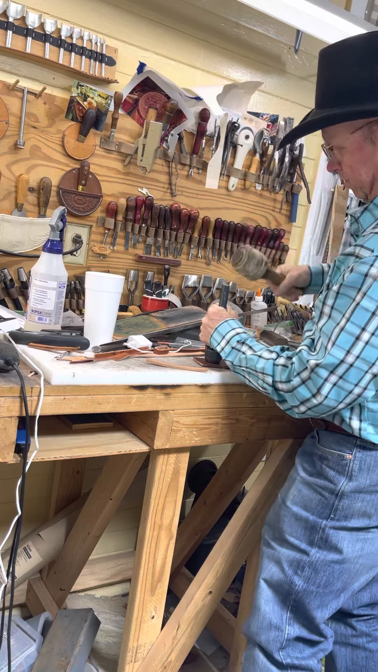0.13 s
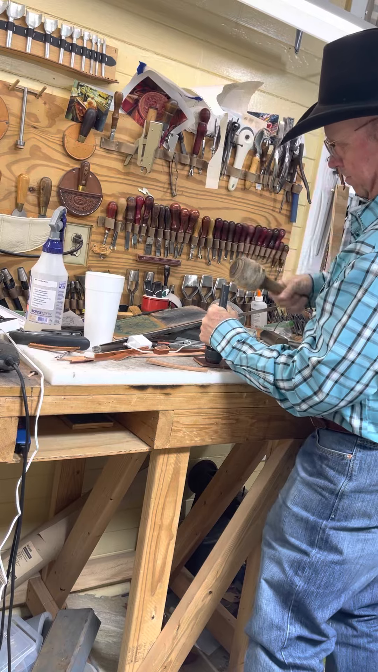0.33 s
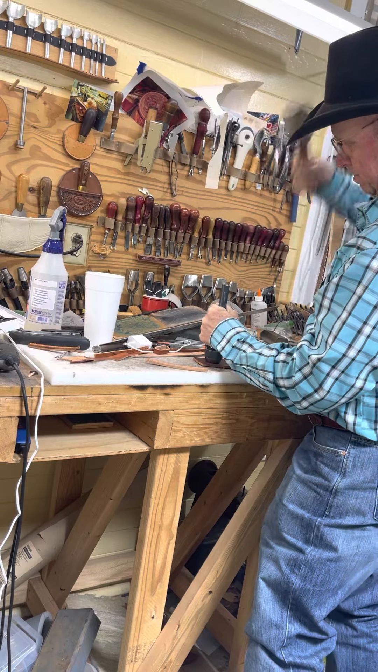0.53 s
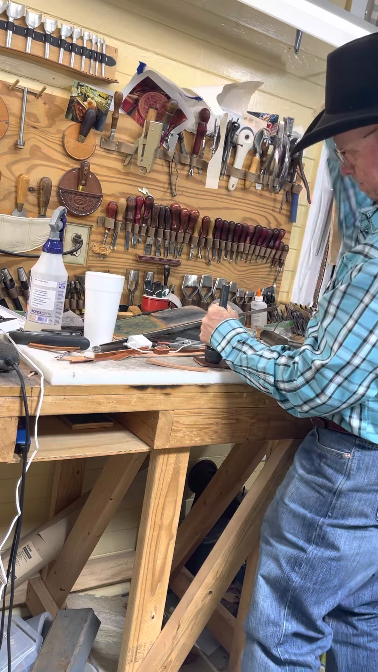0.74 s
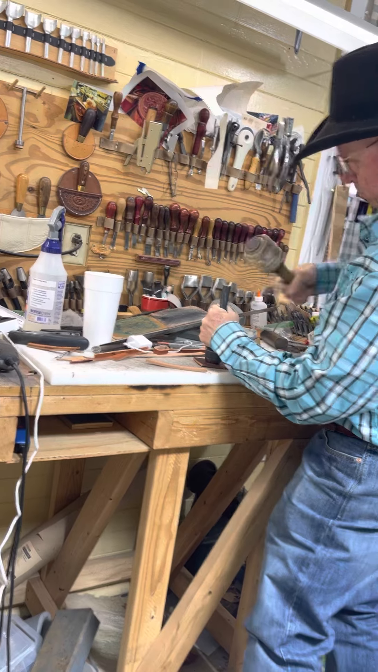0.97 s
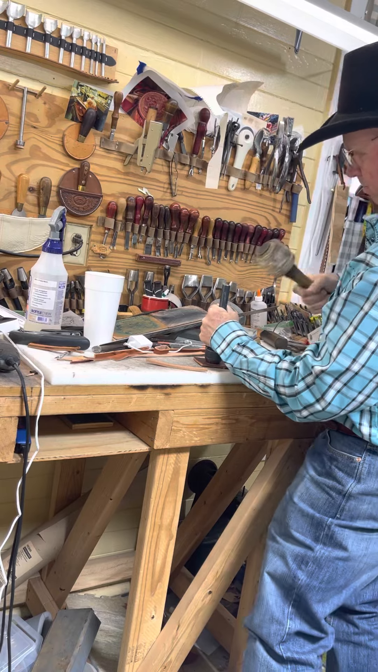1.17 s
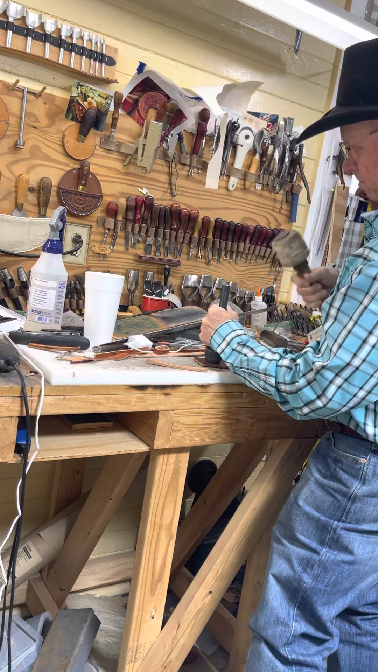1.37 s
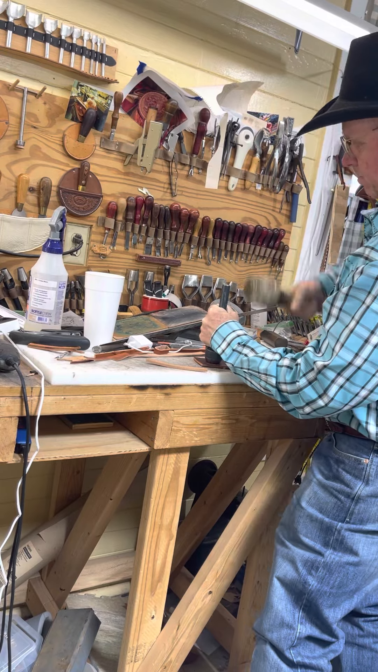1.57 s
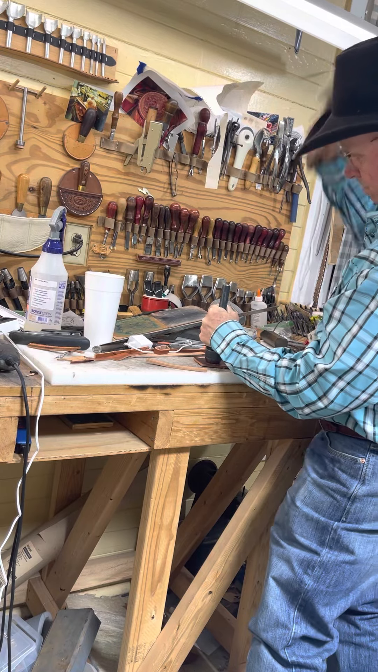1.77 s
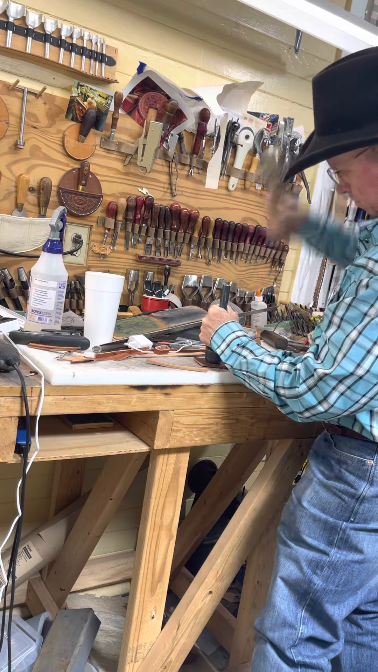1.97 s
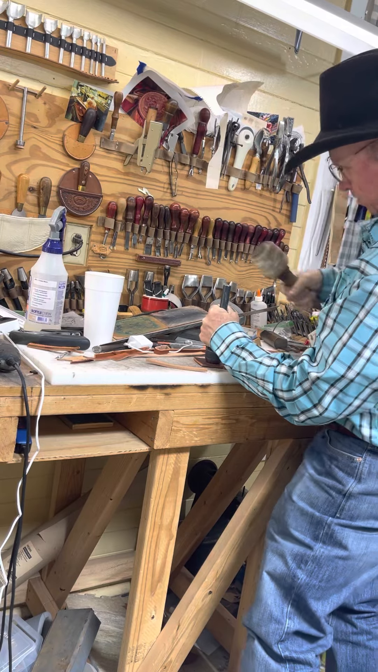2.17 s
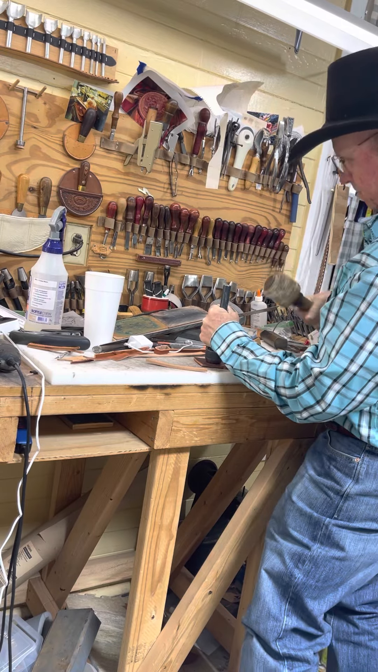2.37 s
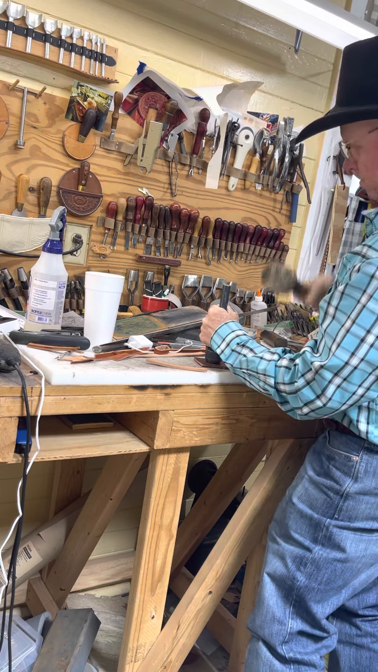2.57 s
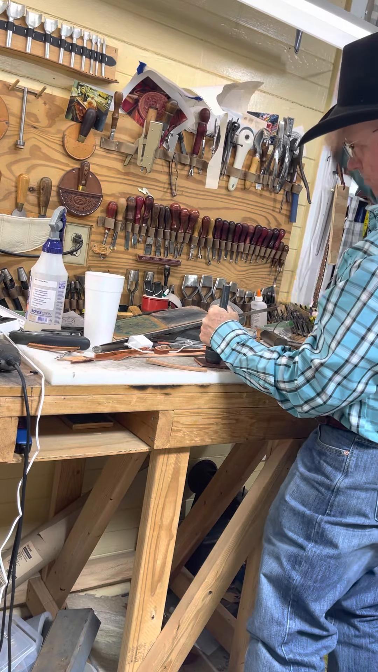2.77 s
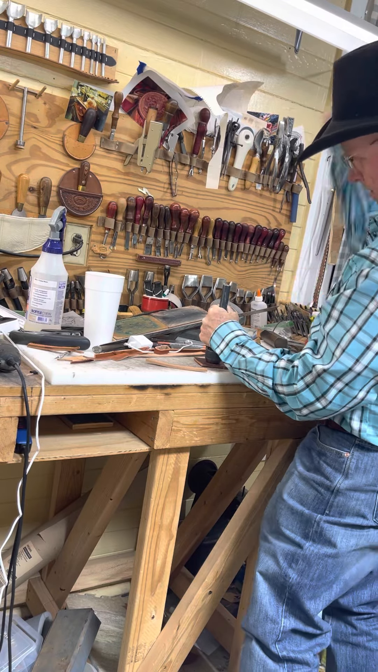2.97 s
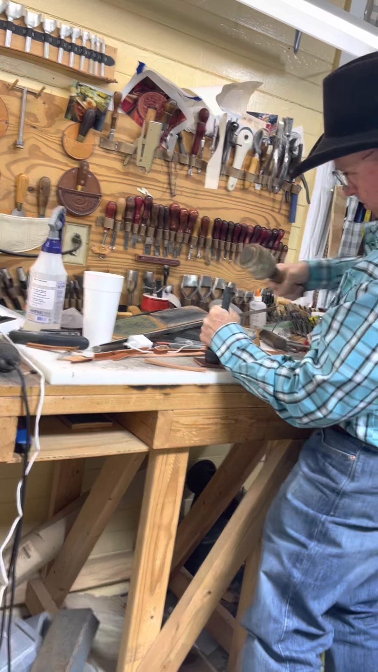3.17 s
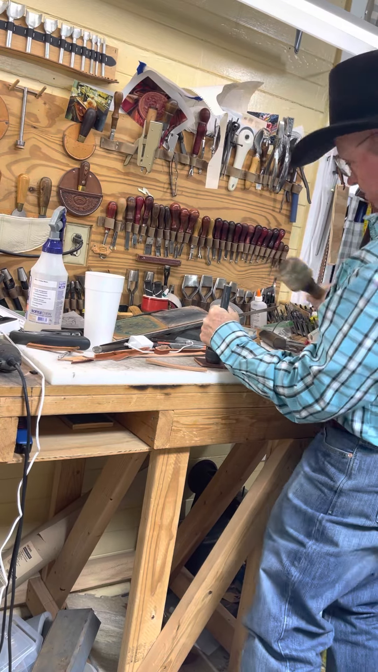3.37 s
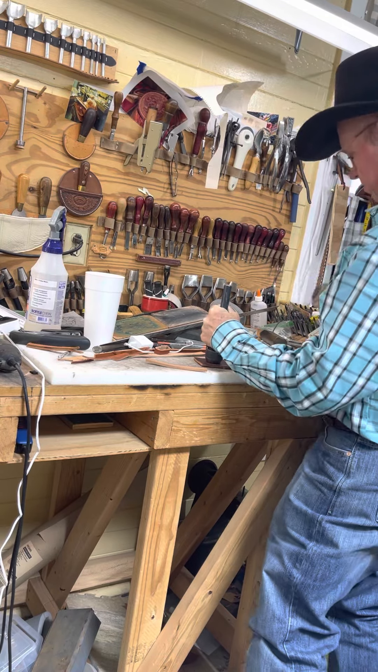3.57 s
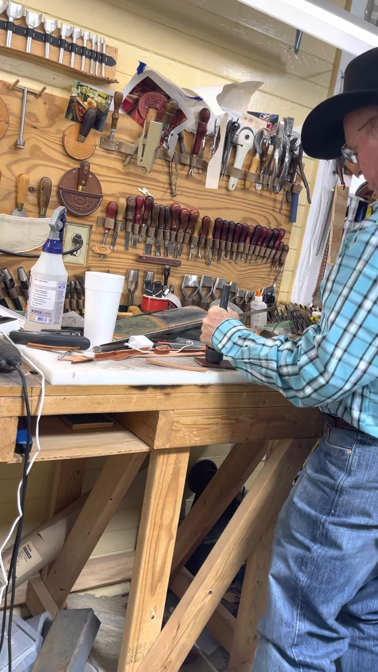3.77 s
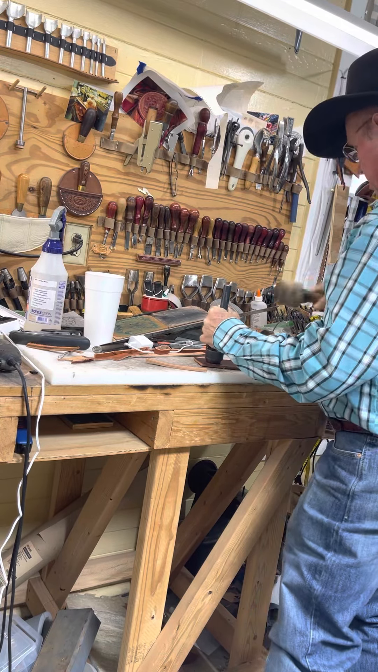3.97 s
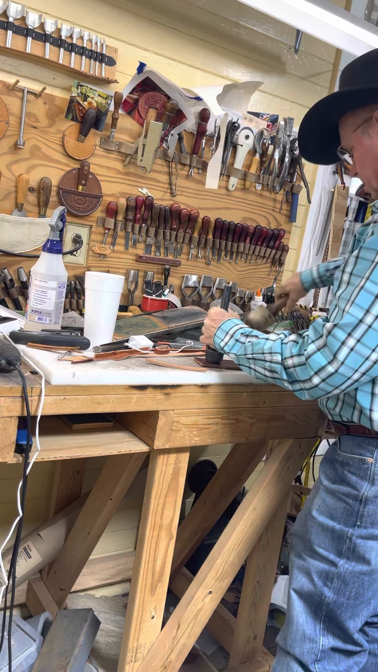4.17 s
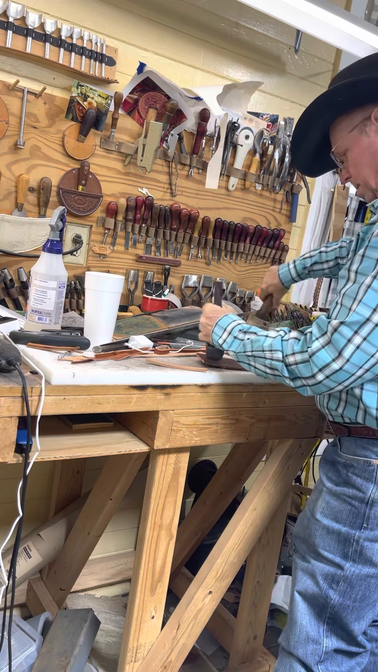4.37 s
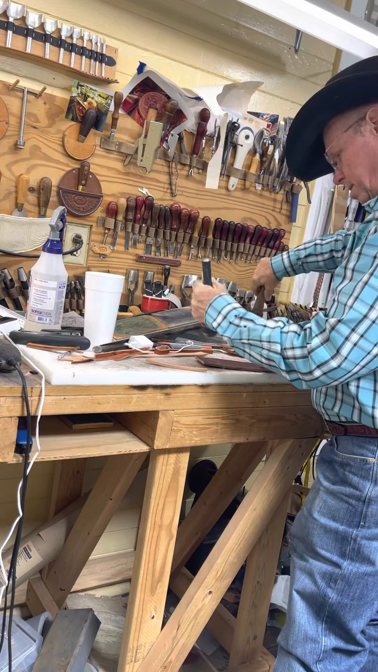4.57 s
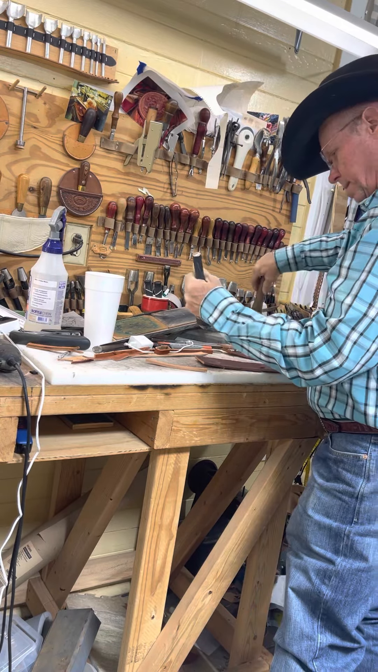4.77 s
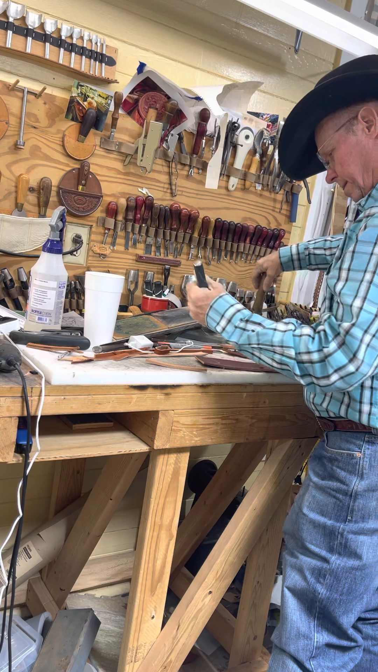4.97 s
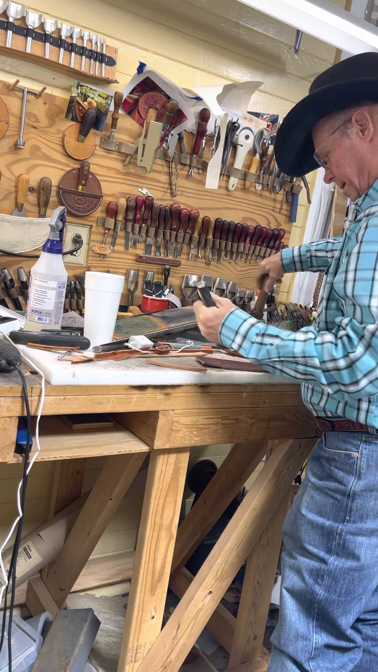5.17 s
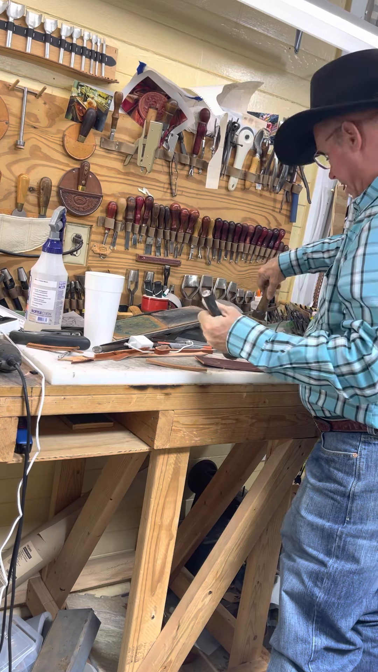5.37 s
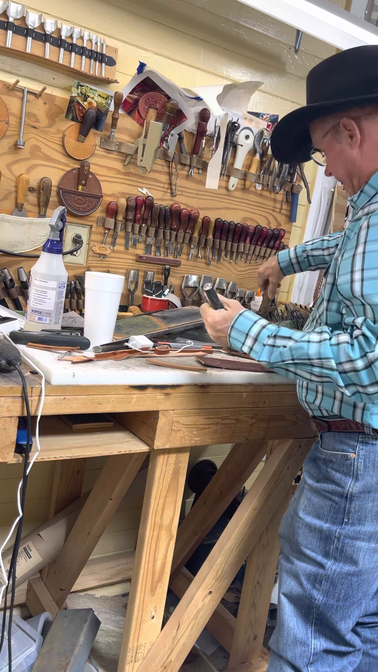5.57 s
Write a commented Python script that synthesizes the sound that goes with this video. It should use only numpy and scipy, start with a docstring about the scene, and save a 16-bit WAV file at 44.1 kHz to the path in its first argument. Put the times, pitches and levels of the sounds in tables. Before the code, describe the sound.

The dying end of a blow, then three sharp, woody, booming mallet strikes about one second apart, close to a stereo recorder that squashes their peaks. Loose tools shake, thin steel rings faintly and the room answers for about half a second. Then the maul is put down with a softer knock, tools tick, scrape and clink, and a last tiny metallic click comes over faint rumble and hiss.

```python
"""At a heavy workbench a wooden maul drives a hand-held steel cutter through leather, about one blow a second.
Noise bursts make each crack, damped modes the booming bench and faint steel ring, decaying noise the room.
A lighter knock follows as the maul comes to rest; then tools clatter, scrape and clink over rumble and hiss.
The recorder's limiter ducks each blow."""
import sys
import numpy as np
from scipy import signal
from scipy.fft import rfft, irfft, next_fast_len
from scipy.io import wavfile
from scipy.ndimage import uniform_filter1d, minimum_filter1d, map_coordinates

SR = 44100
rng = np.random.default_rng(int(sys.argv[2]) if len(sys.argv) > 2 else 0)


def inscribe(sig):
    """Save sig as 16-bit PCM at rate SR to the path in sys.argv[1].

    A 1-D sig is mono; a 2-D sig holds one channel per row.
    Samples are clipped to [-1, 1] before scaling.
    """
    pcm = np.round(np.clip(np.atleast_2d(sig).T, -1, 1) * 32767)
    wavfile.write(sys.argv[1], SR, pcm.astype(np.int16))


N = 247401
T = np.arange(SR) / SR  # one second, the length of every short sound

# spectrum of hard contacts and gritty slides: hz, relative_db_per_hz
TICK = [(500, -4), (2500, -7.5), (4500, -12), (6200, -14), (8500, -13), (11000, -11), (13000, -35),
        (15000, -54.5)]
# hardwood handle: hz, level_db, t60_s
HANDLE_MODES = [(1052, -0.5, 0.012), (1497, -3.5, 0.0078), (2700, -14, .012)]
# racked steel tool: hz, level_db, t60_s
RACK_MODES = [(6140, 0.5, 0.056), (6450, -6.5, 0.081), (11000, -19, 0.073)]
# hand-held cutter when touched: hz, level_db, t60_s
CUTTER_MODES = [(1530, -4, .018), (2710, -6, .016), (3250, -10, .016), (5350, -0.5, 0.16), (5530, -1, 0.13)]


def amp(db):
    """Decibels to gain."""
    return 10 ** (np.asarray(db) / 20)


def unit(x):
    """Scale to rms 1."""
    return x / np.sqrt(np.mean(x ** 2) + 1e-20)


def along(points, hz):
    """Interpolate (hz, value) points on a log frequency axis."""
    f, v = np.transpose(points)
    return np.interp(np.log(hz + 1), np.log(f + 1), v)


def filtered(x, response):
    """Multiply the spectrum of x by a response of frequency."""
    n = x.shape[-1]
    m = next_fast_len(n + SR // 10)
    hz = np.fft.rfftfreq(m, 1 / SR)
    return irfft(rfft(x, m) * response(hz), m)[..., :n]


def add(track, start_s, sound):
    """Mix a sound in, trimmed to the track."""
    start = round(start_s * SR)
    part = sound[..., max(-start, 0):track.shape[-1] - start]
    first = max(start, 0)
    track[..., first:first + part.shape[-1]] += part


def noise(spectrum):
    """One second of coloured noise, the same in both channels."""
    return unit(filtered(rng.standard_normal(SR), lambda hz: amp(along(spectrum, hz))))


def diffuse(spectrum, size=SR):
    """Coloured noise arriving from all sides: mid and side shares set the channel likeness."""
    # left-right likeness of diffuse sound: hz, correlation
    alike = [(150, 0.99), (350, .93), (800, 0.39), (1300, .55), (2000, 0.78), (2700, 0.72), (4400, .5),
             (5900, 0.86), (7500, 1), (11000, 1)]

    def mid_side_gain(hz):
        angle_rad = np.arccos(np.clip(along(alike, hz), -1, 1)) / 2
        return amp(along(spectrum, hz)) * [np.cos(angle_rad), np.sin(angle_rad)]

    mid, side = filtered(rng.standard_normal((2, size)), mid_side_gain)
    return unit(np.array([mid + side, mid - side]))


def strike(t60_s, rise_s, delay_s=0):
    """An envelope that waits, rises and dies away exponentially."""
    age_s = np.maximum(T - delay_s, 0)
    return (1 - np.exp(-age_s / rise_s)) * amp(-60 * age_s / t60_s)


def mode(hz, level_db, t60_s, rise_s, delay_s=0):
    """One damped vibration: a sine under a strike envelope."""
    tone = np.sin(2 * np.pi * hz * (T - delay_s))
    return amp(level_db) * tone * strike(t60_s, rise_s, delay_s)


def wobble(knots_per_s):
    """One second of a smooth random curve."""
    return map_coordinates(rng.standard_normal(int(knots_per_s) + 4), [T * knots_per_s])


def room(spectrum, build_s):
    """The workshop's answer to a short sound: noise whose frequencies each die at their own speed."""
    # reverberation time: hz, t60_s
    room_t60 = [(60, .6), (250, .45), (700, 0.45), (2000, 0.51), (5000, 0.45), (11000, 0.43)]
    hz, t_s, z = signal.stft(diffuse(spectrum), SR, nperseg=256)
    decay = amp(-60 * t_s / along(room_t60, hz)[:, None])
    tail = signal.istft(z * decay, SR, nperseg=256)[1][:, :SR]
    return tail * (1 - np.exp(-T / build_s))


def chatter():
    """The maul makes three contacts, each weaker, plus a strong one as the blade reaches the board."""
    gap_s, loss_db = 0.0038, 5.5
    through_s, through_db = 0.0072, 0
    return [(k * gap_s, -k * loss_db) for k in range(3)] + [(through_s, through_db)]


def crack():
    """Broadband noise, one burst per contact of the chatter."""
    # contact noise: hz, relative_db_per_hz
    crack_spectrum = [(100, -15.5), (600, -2.5), (2000, 1.5), (3500, -0.5), (4200, -3), (5000, -0.5),
                      (6000, -10.5), (7400, -14.5), (8200, -8), (11000, -17), (13000, -31), (16000, -50)]
    bursts = sum(amp(level_db) * strike(0.021, 0.0014, delay_s) for delay_s, level_db in chatter())
    return amp(-8) * noise(crack_spectrum) * bursts


def bench_top():
    """Maul, cutter and bench top ring together; slower low-pitched bending waves arrive last."""
    # joint modes: hz, level_db, t60_s
    top_modes = [(243, 1, .13), (285, -4, .05), (433, 3, .08), (570, -10, .1), (723, -1, .08),
                 (803, -10, .08), (898, -3, .07), (958, -1, .05), (1135, -3, .07), (1243, -3, .07),
                 (1410, -3, .05), (1646, -2, .06), (1792, -7, .05), (1992, -5, .06), (2238, 0, .045),
                 (2565, -8, .04), (3040, -12, .035), (3330, -13, .035), (3470, -10, .035)]
    return amp(-8.5) * sum(mode(hz, level_db + rng.normal(0, 1), t60_s, 0.0015, .09 / np.sqrt(hz))
                           for hz, level_db, t60_s in top_modes)


def bench_frame():
    """The frame and floor boom as damped modes, some set going only by the rebound."""
    # frame and floor modes: hz, level_db, t60_s, delay_s
    frame_modes = [(43, -20.5, .45, .006), (56.9, -20.5, 0.55, 0.0033), (68.6, -20.5, 0.69, 0.0077),
                   (118, -7, 0.033, 0.002), (117.5, 1, .17, 0.038), (159, -15, 0.17, 0.036),
                   (210, -12.5, .2, .016), (227.8, -12, 0.26, 0.011), (321.4, -10, 0.26, .012),
                   (425, -12, 0.07, 0.0089), (560, -10.5, 0.33, 0.011)]
    return amp(-7) * sum(mode(hz, level_db, t60_s, .004, delay_s)
                         for hz, level_db, t60_s, delay_s in frame_modes)


def rattle():
    """Loose tools on the bench jump and rattle: a decaying burst of diffuse noise."""
    # tool noise: hz, relative_db_per_hz
    rattle_spectrum = [(30, -14), (150, -9.5), (300, 6.5), (600, -4), (1100, 1), (2000, -7.5),
                       (4000, -17.5), (7000, -24.5), (11000, -25.5), (13500, -46.5), (15000, -91)]
    return amp(-8.5) * diffuse(rattle_spectrum) * strike(0.18, 0.0037)


def steel_ring():
    """The cutter's thin tone builds up slowly, beats and wavers in the room."""
    # steel modes, the lowest two a beating pair: hz, level_db, t60_s
    steel_modes = [(5484, -1, .62), (5487, -6, .62), (10104, -20, .7), (10573, -16, .42)]
    waver = amp(-29.5 + 1.3 * wobble(45))
    return waver * sum(mode(hz, level_db, t60_s, 0.14) for hz, level_db, t60_s in steel_modes)


def hall(top):
    """The room answers the broad crack and keeps the bench top's notes alive."""
    # room response: hz, relative_db_per_hz
    hall_spectrum = [(25, -23.5), (45, -3), (150, -2.5), (400, 0.5), (750, 3), (1200, -1.5), (2000, -4),
                     (3000, -9), (4800, -17), (6500, -18), (9000, -23), (11200, -17), (12700, -41),
                     (15000, -91)]
    answer = amp(-9.5) * room(hall_spectrum, build_s=0.011)
    top_source = top[None] / np.linalg.norm(top)
    notes = signal.fftconvolve(room(hall_spectrum, build_s=0.002), top_source, axes=1)[:, :SR]
    return answer + amp(-29) * notes


def blows():
    """Each blow cracks on the cutter, spreads through the bench and fills the room."""
    # maul blows, the first already dying away: start_s, force_db, boom_db, ring_db, crack_db
    blow_list = [(-.07, 0, -1.5, 0, 0), (0.8795, 3, 1, -5.5, -4), (2.009, -0.5, -1.5, -1.5, 2),
                 (3.097, -0.5, -2.5, 1.5, 2)]
    out = np.zeros((2, N))
    for start_s, force_db, boom_db, ring_db, crack_db in blow_list:
        top = bench_top()
        # driven hard only while the blade bites through the leather
        biting = .5 - .5 * np.tanh((T - .0108) / 0.003)
        driven = top * amp(4.87 * biting)
        direct = amp(crack_db) * crack() + driven + amp(boom_db) * bench_frame()
        sound = direct + rattle() + amp(ring_db) * steel_ring() + hall(top)
        add(out, start_s, amp(force_db) * sound)
    return out


def background():
    """A low room rumble under a thin hiss; both sink quickly at first, then level off."""
    # room rumble: hz, relative_db_per_hz
    rumble_spectrum = [(20, -24.5), (40, -8), (58, 5.5), (85, -9), (120, 4), (160, -6), (250, -4.5),
                       (330, -8.5), (470, -6.5), (700, -16), (1200, -25), (3000, -46.5), (8000, -110)]
    # hiss: hz, relative_db_per_hz
    hiss_spectrum = [(300, -4), (1000, -1), (2000, -4), (4500, -9), (6300, -10), (8500, -16),
                     (11200, -14.5), (12800, -37), (15000, -80)]
    rumble_db, rumble_extra_db = -62, 23.5  # resting level, starting excess
    hiss_db, hiss_extra_db = -79.5, 24
    settle_s = 1.285
    unsettled = np.exp(-np.arange(N) / SR / settle_s)
    rumble = amp(rumble_db + rumble_extra_db * unsettled) * diffuse(rumble_spectrum, size=N)
    hiss = amp(hiss_db + hiss_extra_db * unsettled) * diffuse(hiss_spectrum, size=N)
    return rumble + hiss


def clatter():
    """The maul meets the bench and nudges tools; harder contacts tick more, thud less, sound higher."""
    # lighter knocks and clatter: start_s, level_db, hardness (0-1)
    knocks = [(3.979, -19.5, 0.29), (4.097, -34, .55), (4.157, -35, 0.8), (4.182, -39, .6),
              (4.233, -36, 0.78), (4.285, -33.5, .55), (4.335, -35, 0.6), (4.375, -39, .2),
              (4.586, -52.5, .1), (4.615, -50.5, 0.42), (5.488, -43, 0.96)]
    # thud modes: hz, level_db, t60_s
    knock_modes = [(259.6, -12.5, 0.21), (338.5, -1, 0.091), (397, -6.5, 0.16), (547, -10.5, 0.14)]
    # wooden contact: hz, relative_db_per_hz
    wood_spectrum = [(60, -15), (300, 2.5), (950, -1), (1600, -10), (3000, -21), (5000, -23), (11000, -36),
                     (15000, -100)]
    out = np.zeros((2, N))
    for start_s, level_db, hardness in knocks:
        # values when soft and when hard
        tick_db = np.interp(hardness, [0, 1], [-36.5, -6])
        thud_db = np.interp(hardness, [0, 1], [4, -20])
        note_hz = np.interp(hardness, [0, 1], [407, 1324])
        wood = amp(-2) * noise(wood_spectrum) * strike(0.03, 0.00049)
        wood_room = amp(-14.5) * room(wood_spectrum, build_s=0.0015)
        note = mode(note_hz, -10.5, 0.046, 0.00025)
        tick = noise(TICK) * strike(0.03, 0.00032) + amp(-7) * room(TICK, build_s=0.0036)
        thud = sum(mode(hz, mode_db, t60_s, 0.003) for hz, mode_db, t60_s in knock_modes)
        sound = wood + wood_room + note + amp(tick_db) * tick + amp(thud_db) * thud
        add(out, start_s, amp(level_db) * sound)
    return out


def rocking():
    """The maul's head lands dully and rocks to rest: fading bumps of low damped modes."""
    # landings: start_s, level_db
    landings = [(4.003, -39.5), (4.39, -35.5), (4.59, -50), (5.541, -48)]
    # bump modes: hz, level_db, t60_s
    bump_modes = [(117.3, -6, 0.11), (164.7, -13, 0.26), (203, -8, 0.13)]
    rock_s, rock_loss_db = .024, 3.5  # per rock
    out = np.zeros((2, N))
    for start_s, level_db in landings:
        for k in range(3):
            bump = sum(mode(hz, mode_db + rng.normal(0, 4.5), t60_s, 0.0015)
                       for hz, mode_db, t60_s in bump_modes)
            add(out, start_s + k * rock_s, amp(level_db - k * rock_loss_db) * bump)
    return out


def scuffs():
    """Steel and leather slide on the bench: gritty noise under a bell-shaped stroke."""
    # slides: middle_s, level_db, half_length_s
    slides = [(4.179, -53, .03), (4.313, -53, 0.041), (4.655, -74.5, 0.038)]
    out = np.zeros((2, N))
    for middle_s, level_db, half_s in slides:
        stroke = np.exp(-.5 * ((T - .5) / half_s) ** 2)
        grit = unit(diffuse(TICK) * amp(5.2 * wobble(250)))
        add(out, middle_s - .5, amp(level_db) * stroke * grit)
    return out


def clinks():
    """Touching tools ring briefly and unevenly; the room smears each ring into a band."""
    # contacts: start_s, level_db, modes that ring
    contacts = [(4.233, -24, HANDLE_MODES), (4.244, -45.5, RACK_MODES), (4.282, -52, RACK_MODES),
                (5.489, -47, CUTTER_MODES)]
    out = np.zeros((2, N))
    for start_s, level_db, modes in contacts:
        for hz, mode_db, t60_s in modes:
            spread = 1.15 + .007 / t60_s  # the shorter the ring, the wider its band
            band = [(hz / spread, -50), (hz, 0), (hz * spread, -50)]
            ring = mode(hz, 0, t60_s, 0.00033) * amp(3.5 * wobble(180))
            # a longer ring puts more energy into the room
            smear = amp(-4) * np.sqrt(t60_s) * room(band, build_s=0.0054)
            add(out, start_s, amp(level_db + mode_db) * (ring + smear))
    return out


def limiter(x, ceiling_db, hold_s, release_s, start_db, recovery_s):
    """Gain drops at once on a loud sound, holds, climbs back; a set opening gain climbs from start_db to 0 dB."""
    power = np.abs(uniform_filter1d(np.mean(x ** 2, axis=0), size=256))
    needed_db = np.minimum(ceiling_db - 10 * np.log10(power + 1e-12), 0)
    # positive origins make both windows look back in time
    h, r = int(hold_s * SR / 2), int(release_s * SR / 2)
    held_db = minimum_filter1d(needed_db, 2 * h + 1, origin=h, mode="constant")
    released_db = uniform_filter1d(held_db, 2 * r + 1, origin=r, mode="constant")
    gain_db = np.minimum(held_db, released_db)
    opening_db = np.interp(np.arange(N) / SR, [0, recovery_s], [start_db, 0])
    return x * amp(np.minimum(gain_db, opening_db))


def scene():
    """Everything heard at the bench."""
    return blows() + background() + clatter() + rocking() + scuffs() + clinks()


def record(dry):
    """The recorder shifts left and right apart in phase in the treble, limits, rounds peaks and cuts the top."""
    # lead of the left channel: hz, phase_rad
    left_lead = [(1600, 0), (2700, .7), (4000, .9), (4600, 1.9), (5300, 5.6), (6200, 6.35), (7200, 7.5),
                 (8600, 9.2), (10000, 10.2), (12000, 12.57)]
    top_hz = 15600
    sides = np.array([[1], [-1]])
    pair = filtered(dry, lambda hz: np.exp(.5j * along(left_lead, hz) * sides))
    held = limiter(pair, ceiling_db=-9, hold_s=0.13, release_s=0.079, start_db=-14, recovery_s=0.19)
    rounded = held / (1 + (held / .92) ** 8) ** (1 / 8)
    return filtered(rounded, lambda hz: hz < top_hz)


dry = scene()
out = record(dry)
inscribe(out)
```